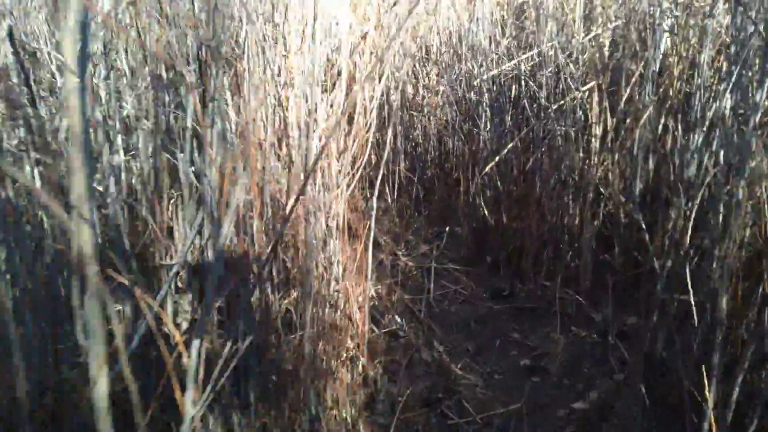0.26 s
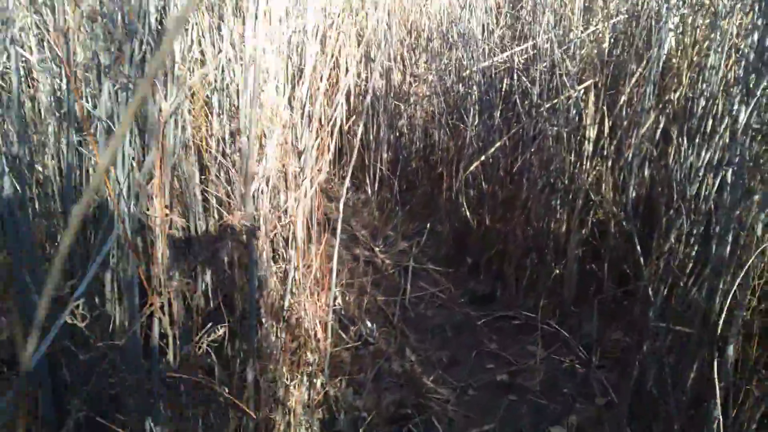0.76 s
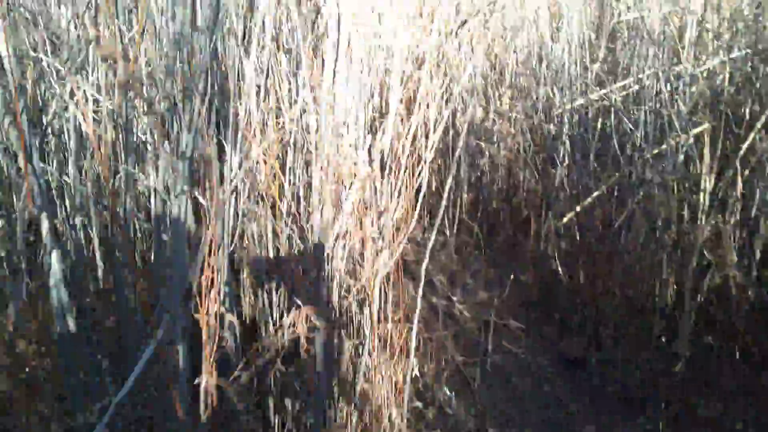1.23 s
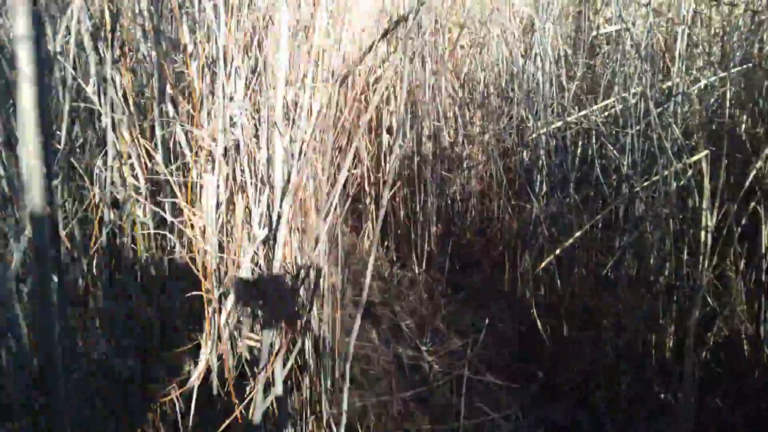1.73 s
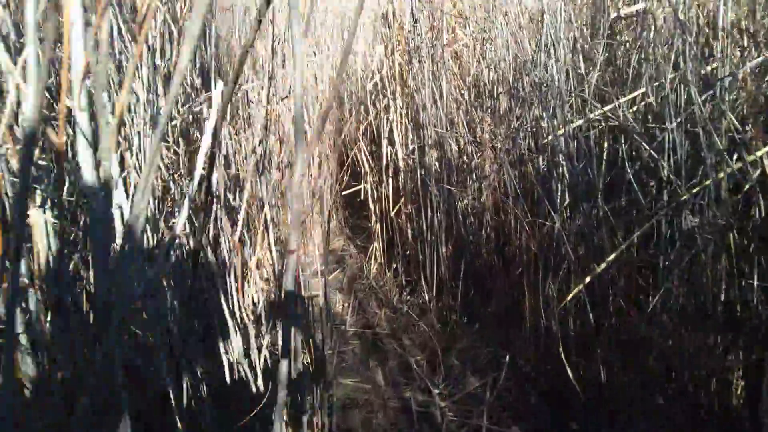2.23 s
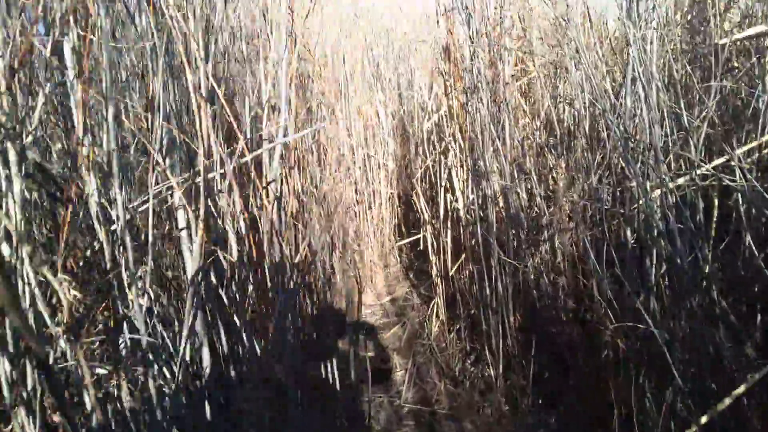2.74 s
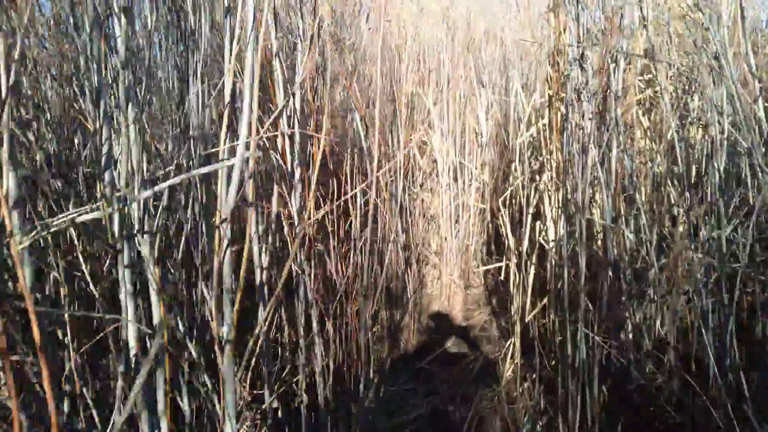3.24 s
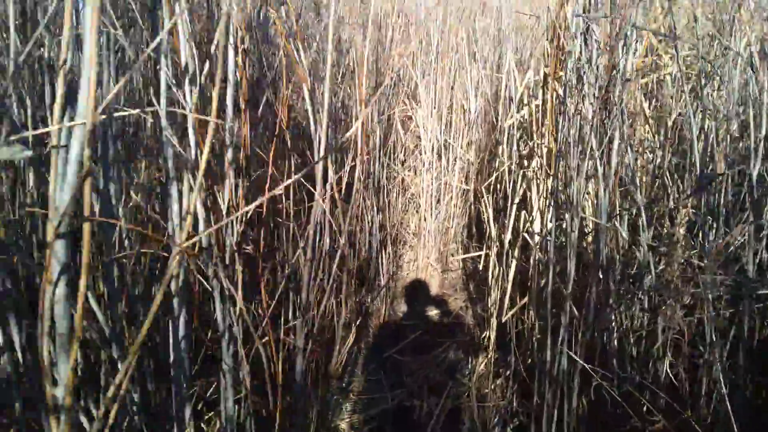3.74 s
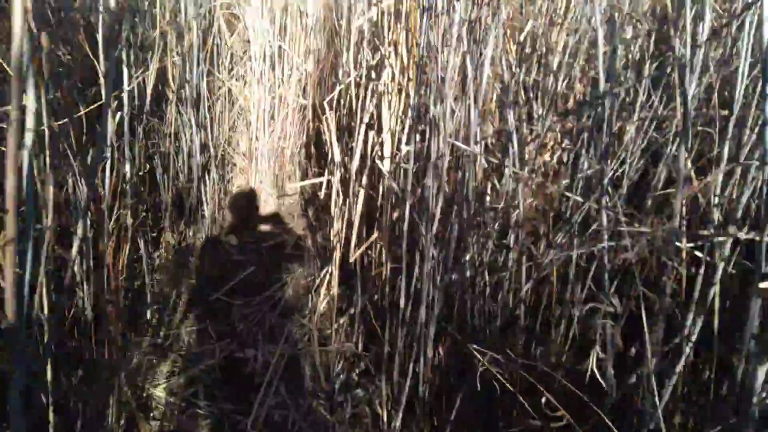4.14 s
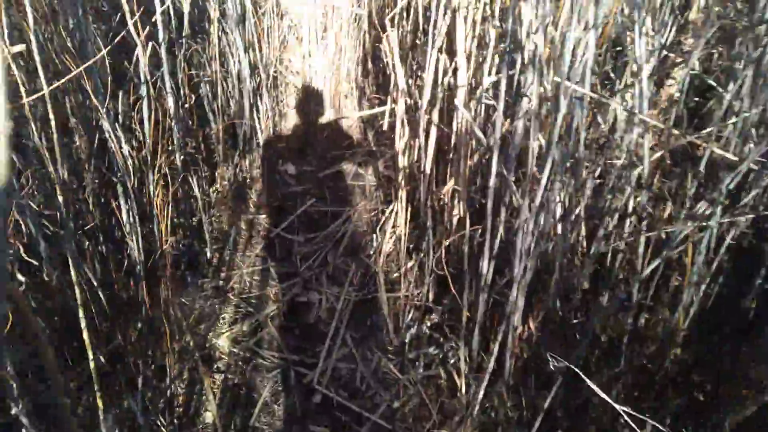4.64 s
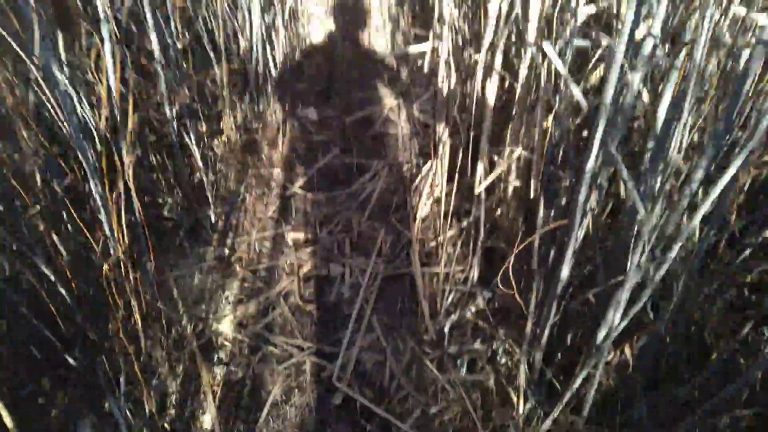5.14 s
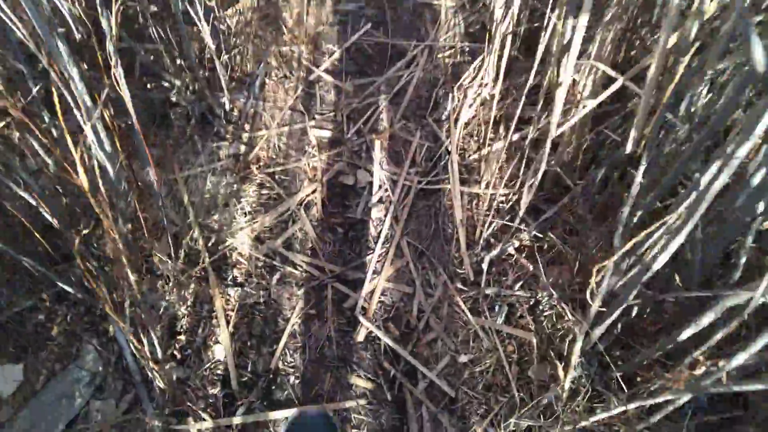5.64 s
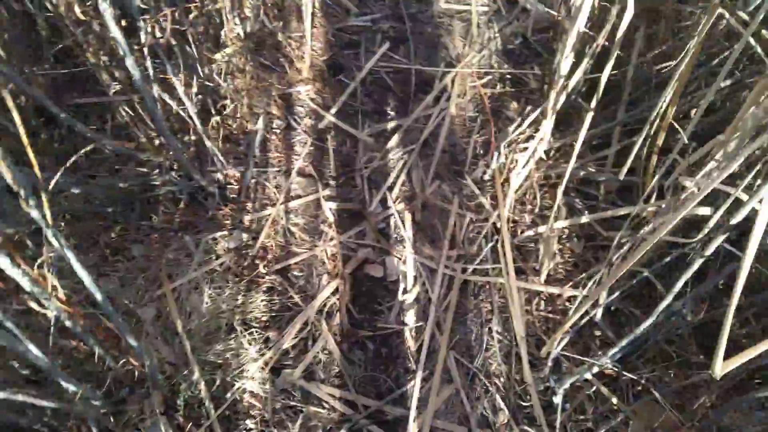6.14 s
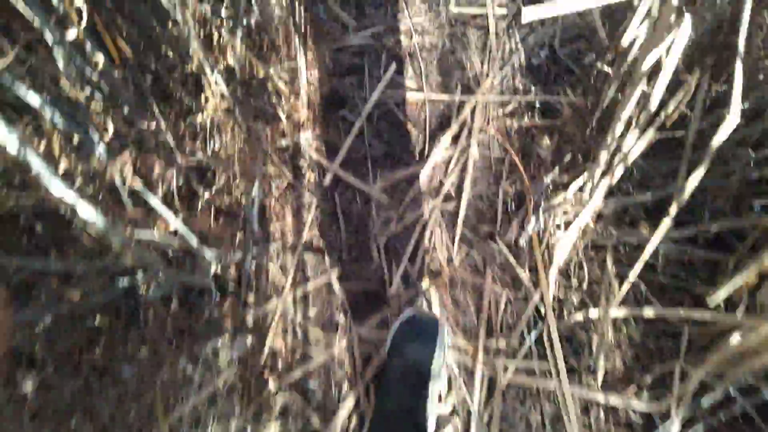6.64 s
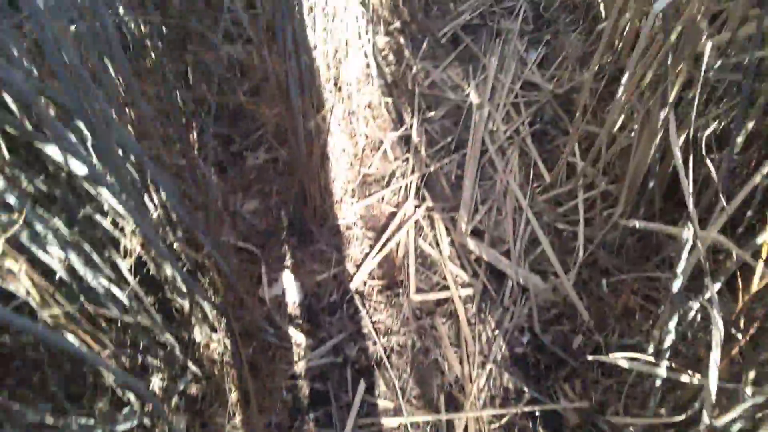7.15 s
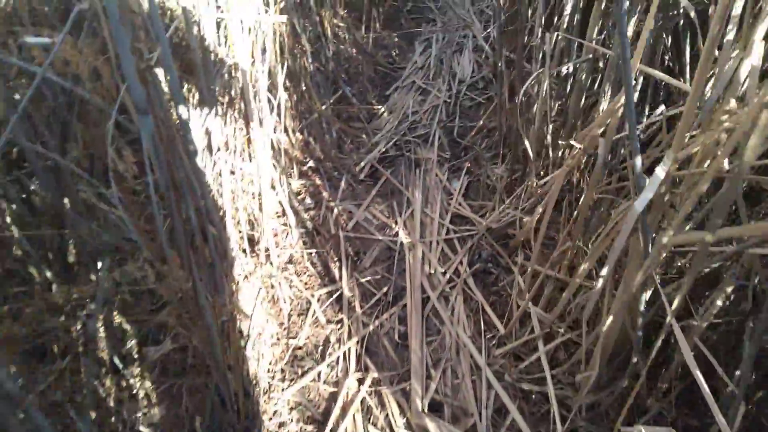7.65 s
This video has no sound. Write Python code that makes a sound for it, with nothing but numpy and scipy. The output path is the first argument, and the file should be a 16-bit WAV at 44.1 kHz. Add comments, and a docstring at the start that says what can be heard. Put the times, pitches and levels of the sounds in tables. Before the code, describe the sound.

Close, dry stereo sound inside an outdoor reed bed. From 0 to 1.4 s someone pushes hard through brittle stalks: bright papery rustling in flurries, splintering bursts around 0.2-0.5 s, dull treads near 0.4 and 0.6 s, and a very sharp crack at 1.15 s. Rustling then lightens, with scattered snaps and hollow knocks near 2.4 and 2.7 s. From about 3.5 to 4.7 s it nearly stops: a distant low rumble and faint wavering machine hum remain, a thin whine swelling briefly at 3.9 s amid tiny ticks. Crackling resumes from 4.8 s and grows, with a crunching step at 5.9 s, more brushing and snaps at 6.2-6.9 s and a bright stalk click at 7.05 s. Rustle eases. At 7.54 s a finger rubs the right port in loud, low, gritty, slowing pulses, sealing it by 7.66 s; the right is muffled, with a soft bump at 7.84 s.

```python
"""Dry reeds scrape as someone pushes through them, pauses, and walks on over fallen stalks.
Leaves, hollow stems and litter are dense random clicks in flurries that follow the walker's effort.
Stalks crack and splinter as bursts of clicks, knock as ringing noise; feet thud in many small knocks.
A far machine hums as wavering sines over a rumble of filtered noise.
Near the end a finger rubs and closes the right microphone port: loud stick-slip pulses and grit."""
import sys
import numpy as np
from scipy import signal
from scipy.fft import rfft, irfft, next_fast_len
from scipy.io import wavfile
from scipy.ndimage import uniform_filter1d

SR = 44100
rng = np.random.default_rng(int(sys.argv[2]) if len(sys.argv) > 2 else 0)


def generate_wav(signal):
    """Clip the signal to [-1, 1] and save it as 16-bit WAV at the path in sys.argv[1]."""
    frames = np.transpose(np.atleast_2d(signal))
    scaled = np.clip(frames, -1, 1) * 32767
    pcm = np.round(scaled).astype(np.int16)
    wavfile.write(sys.argv[1], SR, pcm)


N = 348075
TIME = np.arange(N) / SR


def undb(db):
    """Decibels to gain."""
    return 10 ** (np.asarray(db) / 20)


def unit(x):
    """Scale to rms 1."""
    return x / np.sqrt(np.mean(x ** 2))


def curves(table):
    """Each column of a table joined by straight lines in time."""
    s, *columns = np.transpose(table)
    return [np.interp(TIME, s, column) for column in columns]


def sides(pan_db):
    """Left and right gains of equal total power; pan_db is left minus right."""
    gains = undb(np.array([pan_db, -pan_db]).reshape(2, -1) / 2)
    return gains / np.sqrt(np.mean(gains ** 2, axis=0))


def walk(rate_hz):
    """Random levels held 1 / rate_hz, smoothed twice; rms 1."""
    k = int(SR / rate_hz)
    held = np.repeat(rng.standard_normal(N // k + 1), k)
    smooth = uniform_filter1d(uniform_filter1d(held, k), k)
    return unit(smooth[:N])


def jumps(rate_hz):
    """A new random value about rate_hz times a second, held in between; spread 1."""
    return rng.standard_normal(N)[np.cumsum(rng.random(N) < rate_hz / SR)]


def colour(x, points, size=4096):
    """Minimum-phase filter of unit energy through (pitch_hz, level_db) points."""
    hz, db = np.transpose(points)
    bin_hz = np.fft.rfftfreq(size, 1 / SR) + 1
    log_gain = np.log(undb(np.interp(np.log(bin_hz), np.log(hz), db)))
    # folding the cepstrum makes the response causal
    cepstrum = irfft(log_gain)
    cepstrum[1:size // 2] *= 2
    cepstrum[size // 2 + 1:] = 0
    response = irfft(np.exp(rfft(cepstrum)))
    response /= np.linalg.norm(response)
    return signal.fftconvolve(x, response[None], axes=1)[:, :N]


def add(track, s, sound):
    """Lay a stereo sound into a track at time s."""
    start = int(s * SR)
    track[:, start:start + sound.shape[1]] += sound[:, :N - start]


def clicks(length, rate_hz, spread_db, lag_s=.00012):
    """Random clicks of exponentially spread dB; each reaches the right port with its own lag."""
    fired = rng.random(length) < rate_hz / SR
    strength = np.minimum(rng.exponential(size=length), 6)
    left = fired * rng.choice([-1, 1], length) * undb(spread_db * strength)
    lag = np.round(lag_s * SR * (1 + 2 * rng.standard_normal(length))).astype(int)
    arrival = np.arange(length) + lag
    right = np.bincount(arrival % length, left, length)
    return unit(np.array([left, right]))


def splinters(fade, rate_hz):
    """A burst of clicks under an envelope, its energy set by the envelope alone."""
    return unit(clicks(len(fade), rate_hz, spread_db=3) * fade) * np.sqrt(np.mean(fade ** 2))


def strokes(s, length_s, attack_s, release_s):
    """One envelope for each movement: attack, hold, release."""
    envelopes = []
    for start_s, held_s in zip(s, length_s):
        rise = np.clip((TIME - start_s) / attack_s, 0, 1)
        fall = np.exp(-np.clip((TIME - start_s - held_s) / release_s, 0, 20))
        envelopes.append(rise * fall)
    return np.array(envelopes)


def together(steady, gains, envelopes):
    """A steady gain and the movements on top of it, added in power."""
    return np.sqrt(steady ** 2 + gains ** 2 @ envelopes ** 2)


def effort():
    """The walker's push in dB, low across the pause and 5 dB down once the feet stop."""
    # one table per bout of walking: time_s, effort_db
    bouts = [
        [(0.0, -44), (0.15, -39), (0.27, -34.5), (1.22, -38), (1.38, -40.5), (2.19, -46.5), (2.62, -40.5),
         (3.14, -45.5), (3.5, -69.5)],
        [(4.68, -65), (4.84, -50.5), (4.99, -47.5), (5.45, -44), (6.12, -36.5), (6.25, -41), (6.8, -33),
         (7.37, -40.5), (7.5, -36.5)],
    ]
    return curves(np.vstack(bouts))[0] + np.where(TIME > 7.28, -5, 0)


def rubbed(x, hz, width_hz=330):
    """Resonance of whichever hollow stalk is rubbed: one complex pole turning at a moving pitch."""
    turn = np.exp(2j * np.pi * np.cumsum(hz) / SR)
    pole = np.exp(-np.pi * width_hz / SR)
    ring = signal.lfilter([1], [1, -pole], x / turn) * turn
    return np.sqrt(2 * (1 - pole ** 2)) * ring.imag


def rustle(sway_db=2.0, swish_db=1.5, stem_db=-4.5, litter_db=-3.5, rub_db=-3.0, wander=0.095):
    """Leaves catch and slip in flurries that also rattle stems and litter, all following the effort.
    Swishes add leaves; treads add stems, litter and a rubbed stalk."""
    # leaves sweeping along the body: start_s, length_s, relative level_db, pan_db (left minus right)
    swishes = [(0.073, 0.088, -33, -3), (0.237, .22, -31.5, -2), (0.764, 0.077, -32, -2),
               (0.949, .28, -39, 2.5), (1.358, .04, -41.5, 2), (1.594, 0.057, -46.5, 1),
               (2.288, 0.058, -39.5, -1), (2.435, 0.063, -40, 3), (2.586, 0.12, -40.5, 2),
               (2.94, 0.13, -47.5, 0), (3.954, 0.1, -55, 1), (4.054, .17, -66.5, 5),
               (4.856, 0.17, -45.5, 0), (5.772, 0.26, -42.5, -3), (6.167, 0.098, -34, -5),
               (6.446, 0.079, -35, -5), (6.54, 0.33, -38.5, -1), (6.844, 0.067, -39, -3),
               (7.13, .12, -40.5, 0.5), (7.363, 0.16, -43, -2)]
    # a foot pressing stalks into the litter, levels relative:
    # start_s, length_s, stem_db, litter_db, rubbed_stalk_db, rubbed_stalk_hz
    treads = [(0, 0.36, -60, -52.5, -52, 1320), (0.23, 0.057, -36, -43, -37.5, 1140),
              (0.364, .1, -44, -50, -55, 1470), (.59, 0.088, -61, -46.5, -57, 970),
              (0.709, 0.046, -46, -45, -50, 1700), (0.957, 0.24, -71, -56.5, -55, 1690),
              (1.21, 0.25, -60, -61, -56.5, 1650), (1.584, 0.244, -63, -75, -59.5, 1640),
              (2.43, 0.445, -62, -82, -54.5, 1670), (2.881, 0.11, -56.5, -60, -53, 1640),
              (3.698, 0.24, -76, -74.5, -76, 770), (3.937, 0.13, -71, -75, -62, 1066),
              (4.726, 0.12, -63.5, -73, -64.5, 1350), (4.913, 0.18, -53, -64, -71, 1570),
              (5.267, 0.5, -80, -62.5, -62, 880), (5.748, 0.23, -52, -56, -51, 945),
              (5.97, 0.2, -61, -58.5, -69, 1520), (6.568, 0.5, -59, -53, -58, 1240),
              (7.002, 0.16, -57, -55.5, -53, 1220), (7.195, 0.033, -68, -68, -52, 1660)]
    push_db = effort()
    flurry = undb(1.48 * walk(90) + 0.67 * walk(350))

    s, length_s, db, pan_db = np.transpose(swishes)
    swish = strokes(s, length_s, attack_s=0.022, release_s=.025)
    steady_leaf = undb(push_db - 2) * sides(-1 + sway_db * walk(8))
    leaf_gain = together(steady_leaf, undb(db + swish_db) * sides(pan_db), swish)

    s, length_s, stems_db, litters_db, stalks_db, stalks_hz = np.transpose(treads)
    tread = strokes(s, length_s, attack_s=0.015, release_s=0.024)
    bending = undb(push_db - 17.5)
    litter_gain = together(undb(push_db - 24), undb(litters_db), tread)
    scrape_gain = together(bending * undb(-4.5), undb(stalks_db), tread)
    stem_gain = together(bending, undb(stems_db), tread)
    pitch_hz = np.interp(TIME, s + length_s / 2, stalks_hz) * np.exp(wander * jumps(60))

    stems = clicks(N, rate_hz=1600, spread_db=2.0) * flurry
    leaves = clicks(N, rate_hz=4000, spread_db=0.48) * flurry * leaf_gain
    litter = clicks(N, rate_hz=2700, spread_db=3.0) * flurry * litter_gain
    scrape = rubbed(stems * scrape_gain, pitch_hz)
    return leaves, stems * stem_gain * undb(stem_db), litter * undb(litter_db), scrape * undb(rub_db)


def shifting(x, spread_db, rate_hz, count=14):
    """One stalk after another takes over: neighbouring bands swell separately."""
    size = next_fast_len(N)
    spectrum, out = rfft(x, size), 0
    log_hz = np.log(np.linspace(1, SR / 2, spectrum.shape[1]))
    place = np.interp(log_hz, np.log([400, 15000]), [0, count - 1])
    for k in range(count):
        weight = np.maximum(1 - abs(place - k), 0)
        band = irfft(spectrum * weight, size)[:, :N]
        out = out + band * undb(spread_db * walk(rate_hz * rng.uniform(.7, 1.3)))
    return out


def tone(hz, drift):
    """A sine of rms 1 whose pitch wanders by the share drift."""
    return unit(np.sin(2 * np.pi * np.cumsum(hz * (1 + drift * walk(22))) / SR))


def distance(waver_db=3, drift=0.023, whine_drift=0.0052, apart_hz=900, hum_db=-3, whine_waver_db=2.4):
    """Far rumble, alike at both ports in the bass, and the wavering drone and whine of a machine."""
    # rumble colour: pitch_hz, relative level_db
    far_colour = [(25, -21), (45, -18), (66, 2.5), (100, -1.5), (150, -9), (250, -14.5), (400, -20),
                  (650, -17), (1200, -27.5), (4000, -41.5), (15000, -37)]
    # drone over time: time_s, relative level_db
    drone_level = [(0.0, -55), (0.56, -52.5), (1.42, -60), (4.74, -67.5), (7.03, -61.5), (7.4, -58.5)]
    # drone partials: pitch_hz, relative level_db
    partials = [(68, -10), (115, -3.5), (136, -10), (208, -5.5), (275, -15.5)]
    # the whine swells once: centre_s, half_width_s, rise_db
    swell_s, width_s, rise_db = (3.86, .15, 11.5)
    mid, side = colour(rng.standard_normal((2, N)), far_colour)
    side = signal.sosfilt(signal.butter(1, apart_hz, "high", fs=SR, output="sos"), side)
    rumble = (mid + side * np.array([[1], [-1]])) * undb(-65.5 + 0.46 * walk(4.4))
    drone_db = curves(drone_level)[0] + hum_db
    drone = sum(tone(hz, drift) * undb(drone_db + db + waver_db * walk(5.1)) for hz, db in partials)
    whine_db = -82.5 + rise_db / (1 + ((TIME - swell_s) / width_s) ** 4)
    whine = tone(606, whine_drift) * undb(whine_db + whine_waver_db * walk(19))
    return rumble + drone + whine


def strays(per_s=40, fade_s=0.00061, stem_db=-13):
    """Thin stalks snap at random, as loud as the walker pushes."""
    t = TIME[:SR // 30]
    burst = splinters(np.exp(-t / fade_s), rate_hz=7000)
    snaps = signal.fftconvolve(clicks(N, per_s, spread_db=2.5), burst, axes=1)[:, :N]
    snaps = unit(snaps) * undb(effort() - 10.5)
    return snaps, snaps * undb(stem_db)


def breaks(crack_s=0.00077, crack_db=-3.0, crunch_db=-9, first_s=0.0013, first_db=3, rise_s=.0012, sharpness=.9):
    """A stalk gives way in one crack, or tears fibre by fibre after a strong first break."""
    # single cracks, levels relative: start_s, level_db, pan_db (left minus right), stem_db
    cracks = [(.318, -6, -4.5, -20.5), (0.4433, -3.5, 5, -9), (.775, -9, 9, -27), (.796, -8.5, -15, -28),
              (1.155, 1, -13, -20.5), (1.163, -4.5, -25, -29), (2.4412, -18.5, 2, -27),
              (2.4603, -19, -1, -19), (3.0844, -26, 8, -9), (3.6614, -52, -5, -21), (3.933, -38, 3, -6),
              (4.1286, -31.5, -5, -16), (4.5446, -23.5, -1.5, -9), (4.9472, -12, 5, -19),
              (5.176, -23.5, -5, -23), (5.5412, -19.5, -1, -25), (5.85, -19, -1, -20), (5.893, -9, -6, -16),
              (6.43, -19, -11, -35), (6.678, -11.5, -7, -22)]
    # splintering runs, levels relative: start_s, level_db, pan_db (left minus right), stem_db, fade_s
    crunches = [(0.1202, -16, -2, -16, 0.023), (.22, -4, -6, -25, 0.0042), (.2398, 3, -7.5, -19.5, 0.0065),
                (0.2568, -1.5, -1, -18, .008), (0.2886, -5, -3, -20, 0.013), (0.4, -7.5, -2, -13, 0.0094),
                (.4775, -14, -4, -13, 0.0088), (.5325, -13, -3.5, -21, 0.014),
                (0.628, -13.5, 7, -22, 0.012), (0.7614, -13, 1, -27, 0.0069), (.977, -14.5, -1, -21, .0085),
                (1.109, -14.5, 7, -11, 0.0067), (1.25, -19.5, 12, -8.5, 0.0085), (1.3378, -24, 3, -23, .01),
                (1.7982, -19.5, -4, -8.5, 0.01), (2.128, -23.5, 31, -13, 0.012),
                (2.317, -17.5, -7, -12.5, 0.02), (2.665, -23, -1, -15, 0.029),
                (2.7235, -12, 1, -20.5, 0.022), (2.9043, -28, -0.5, -21, 0.064),
                (3.3208, -35.5, 3, -21.5, 0.034), (3.9766, -41.5, 0, -10, .036),
                (4.831, -31.5, -3, -10, 0.02), (4.93, -23, 1.5, -9, 0.011), (4.988, -22, 4, -12, 0.011),
                (5.05, -18, 0.5, -24, 0.019), (5.393, -23.5, -1, -30, 0.016), (5.554, -24, 1, -26, 0.024),
                (5.847, -22, 0, -26, 0.041), (5.915, -12.5, -5, -21, 0.033),
                (6.0038, -18, -14, -22, 0.0094), (6.4282, -24, -4, -32, 0.035),
                (7.055, -19.5, 1, -29, 0.036), (7.327, -24.5, -1, -19, 0.021)]
    edge, stems = strays()
    t = TIME[:SR // 6]
    for s, db, pan_db, stem_db in cracks:
        burst = splinters(np.exp(-t / crack_s), rate_hz=33000) * undb(db + crack_db)
        # the harder the crack, the sharper its edge
        sharp = burst - min(sharpness * undb(db), 1) * np.roll(burst, 1, axis=1)
        add(edge, s, sharp * sides(pan_db))
        add(stems, s, burst * undb(stem_db))
    for s, db, pan_db, stem_db, fade_s in crunches:
        fade = np.exp(-t / fade_s) + undb(first_db) * np.exp(-t / first_s)
        fade = fade * (1 - np.exp(-t / rise_s))
        burst = splinters(fade, rate_hz=7000) * undb(db + crunch_db)
        add(edge, s, burst * sides(pan_db))
        add(stems, s, burst * undb(stem_db))
    return edge, stems


def thuds(thud_db=-7, rise_s=0.0014):
    """The mat of dead stalks collapses under a blow in many small knocks."""
    # blows of feet and thick stalks: start_s, relative level_db, fade_s
    blows = [(.291, -39, 0.076), (.394, -24.5, 0.021), (.621, -19.5, 0.0077), (.732, -33.5, 0.055),
             (.986, -27.5, 0.0072), (1.153, -35, 0.026), (2.722, -37.5, .01), (5.28, -44, .013),
             (5.79, -41.5, 0.028), (5.901, -20, 0.0094), (6.659, -36.5, 0.032), (6.838, -26, 0.0057),
             (7.051, -23.5, .01), (7.736, -34, 0.016)]
    out, t = np.zeros((2, N)), TIME[:SR // 4]
    for s, db, fade_s in blows:
        fade = np.exp(-t / fade_s) * (1 - np.exp(-t / rise_s))
        add(out, s, clicks(len(t), rate_hz=2500, spread_db=-1) * fade * undb(db + thud_db))
    return out


def knocks(knock_db=-5, width_hz=520, rattle_s=0.0033):
    """A hollow stalk rattles against its neighbour and rings briefly at its own pitch."""
    # start_s, relative peak level_db, pitch_hz
    stalk_knocks = [(.443, -16.5, 1970), (.624, -17, 806), (.628, -20.5, 1460), (1.112, -20, 1590),
                    (1.381, -31, 1260), (2.318, -19.5, 2660), (2.463, -20.5, 3440), (2.724, -24, 1470),
                    (2.727, -25, 520), (3.932, -32.5, 1355), (3.963, -39, 1060), (4.194, -46.5, 1400),
                    (4.544, -45.5, 1280), (4.762, -40.5, 1470), (4.94, -32, 1700), (5.28, -34, 650),
                    (5.827, -30, 910), (5.903, -22, 1500), (5.908, -22.5, 370), (6.842, -25, 1100),
                    (6.956, -19, 5900), (7.055, -11, 5450), (7.232, -30.5, 1630), (7.249, -27.5, 1540),
                    (7.735, -28.5, 2220)]
    out, t = np.zeros((2, N)), TIME[:SR // 20]
    for s, db, hz in stalk_knocks:
        contact = rng.standard_normal((2, len(t))) * np.exp(-t / rattle_s)
        ring = signal.lfilter(*signal.iirpeak(hz, hz / width_hz, fs=SR), contact)
        add(out, s, ring / abs(ring).max() * undb(db + knock_db))
    return out


def thicket(x, t60_s=0.064, wet_db=-7):
    """The surrounding stalks scatter every click into a short tail, different at each port."""
    t = TIME[:SR // 5]
    tail = rng.standard_normal((2, len(t))) * np.exp(-np.log(1000) * t / t60_s)
    tail /= np.linalg.norm(tail, axis=1, keepdims=True)
    return x + undb(wet_db) * signal.fftconvolve(x, tail, axes=1)[:, :N]


def ports(x):
    """The small cavity behind each port rings for a few cycles at every click."""
    # left, then right cavity: pitch_hz, width_hz, level_db
    cavities = [(7760, 1580, 5), (8880, 1700, 7.5)]
    heard = []
    for ear, (hz, width_hz, db) in zip(x, cavities):
        ring = signal.lfilter(*signal.iirpeak(hz, hz / width_hz, fs=SR), ear)
        heard.append(ear + undb(db) * ring)
    return np.array(heard)


def sealed():
    """How far the finger has closed the right port, 0-1."""
    # closing starts_s, ends_s
    closing = (7.642, 7.662)
    return np.interp(TIME, closing, [0, 1])


def finger(grit_db=0, even_s=0.0284, press_db=5, soft_hz=2000, slowest_hz=70):
    """Skin sticks and slips unevenly over the right port, ever slower, and pumps the trapped air."""
    # pressure of the sliding finger: time_s, relative level_db
    press = [(7.542, -18), (7.552, -18), (7.614, -11), (7.638, -17), (7.662, -29.5), (7.696, -49),
             (7.804, -54), (7.842, -33.5), (7.89, -49.5)]
    # skin colour: pitch_hz, relative level_db
    skin_colour = [(30, -30), (55, -4), (90, 2.5), (170, -2), (340, -10.5), (590, -15), (1000, -26.5),
                   (2000, -27.5), (8000, -43.5), (14000, -47)]
    since_s = TIME - press[0][0]
    touching = np.clip(since_s / .008, 0, 1)  # lands in 8 ms
    start_hz, slowing_s = 148.4, .15
    slip_hz = np.maximum(start_hz * np.exp(-np.maximum(since_s, 0) / slowing_s), slowest_hz)
    turns = np.cumsum(touching * slip_hz * np.exp(.55 * walk(220))) / SR
    slips = np.diff(np.floor(turns), prepend=0) * np.sqrt(SR / slip_hz)
    slips = signal.sosfilt(signal.butter(1, soft_hz, fs=SR, output="sos"), slips)
    # ridges of the skin rasp after each slip
    grit = unit(rng.standard_normal(N) * np.exp(-(turns % 1)))
    pressure = colour((undb(grit_db) * grit - slips)[None], skin_colour)[0]
    # even out the level so that the table sets it
    pressure /= np.sqrt(uniform_filter1d(pressure ** 2, int(even_s * SR)))
    # once the port is sealed only the bass gets through
    dull = signal.sosfilt(signal.butter(3, 330, fs=SR, output="sos"), pressure)
    closed = sealed()
    heard = (1 - closed) * pressure + closed * dull
    right_only = np.array([[0], [1]])
    return heard * undb(curves(press)[0] + press_db) * touching * right_only


def scene():
    """Reeds and footfalls close by, the far background, and the finger on the port."""
    # colours of leaves, hollow stems, ground litter and the dull body of a blow:
    # pitch_hz, relative level_db
    leaf_colour = [(1000, -34), (2500, -9.5), (4200, -8.5), (5500, -2.5), (7500, -2.5), (9500, 1),
                   (11500, -1), (14000, -1.5), (16000, -3.5)]
    stem_colour = [(200, -12.5), (600, -14), (1100, -2), (1700, 2), (2600, 0), (4000, 2.5), (7000, -24.5),
                   (14000, -28.5)]
    litter_colour = [(60, -24), (160, -1), (280, -1), (400, -1), (560, -4), (900, -15), (1600, -11.5),
                     (4000, -28)]
    blow_colour = [(40, -24), (110, -7.5), (190, 2), (380, -1), (600, -8), (1000, -17), (1800, -19.5),
                   (4000, -31)]
    leaves, stems, litter, scrape = rustle()
    edge, broken_stems = breaks()
    bright = shifting(colour(leaves, leaf_colour), spread_db=1.62, rate_hz=51) * undb(-1.0)
    woody = shifting(colour(stems, stem_colour), spread_db=5.0, rate_hz=29) + scrape
    ground = (colour(litter, litter_colour) + colour(thuds(), blow_colour)) * sides(pan_db=-2.0)
    snapping = colour(edge, leaf_colour) * undb(-1) + colour(broken_stems, stem_colour) + knocks()
    # stalks break right beside the microphone, so their sound is drier
    reeds = thicket(bright + woody + ground, wet_db=-5.0) + thicket(snapping, wet_db=-9.5)
    # the closed right port lets in 37 dB less from outside
    open_ports = undb(-37 * sealed() * np.array([[0], [1]]))
    return (ports(reeds) + distance()) * open_ports + finger()


def record(dry, low_hz=50, top_hz=15850, lopsided=0.15):
    """The microphone overloads unevenly, adding a low pop to the loudest cracks; deep bass and top are cut."""
    driven = np.tanh(dry)
    # the diaphragm gives more easily one way than the other
    driven = driven + lopsided * driven ** 4
    thinned = signal.sosfilt(signal.butter(6, low_hz, "high", fs=SR, output="sos"), driven)
    return signal.sosfilt(signal.ellip(10, .2, 70, top_hz, fs=SR, output="sos"), thinned)


dry = scene()
out = record(dry)
generate_wav(out)
```